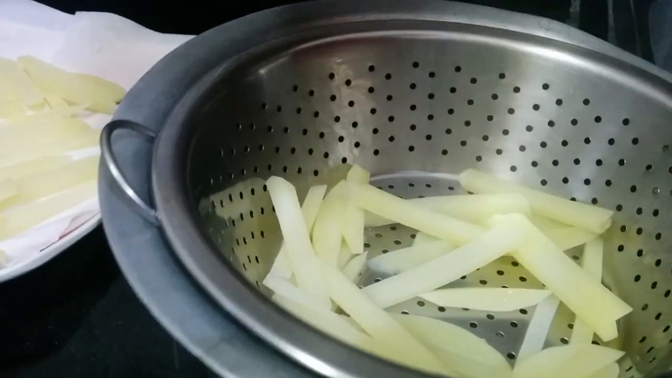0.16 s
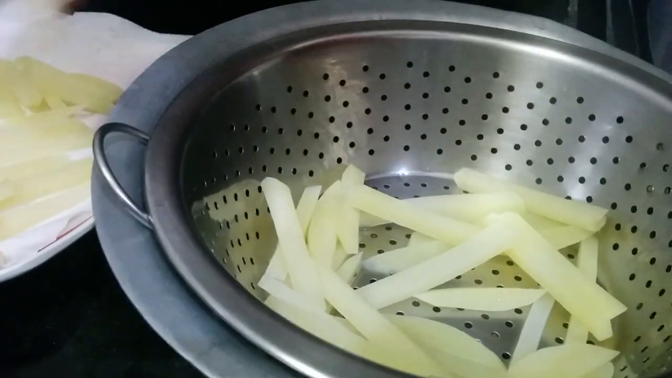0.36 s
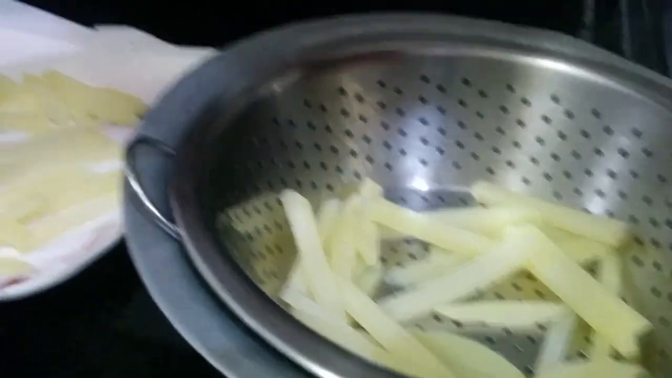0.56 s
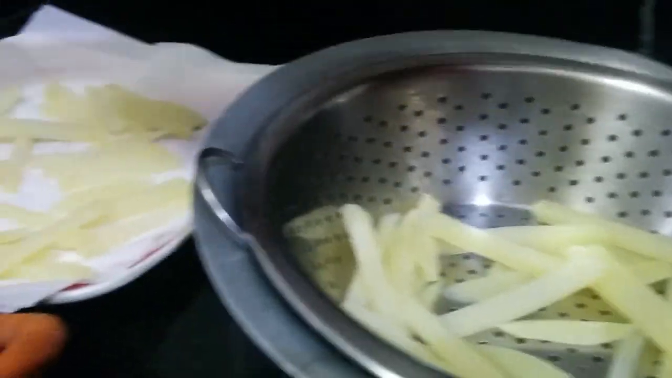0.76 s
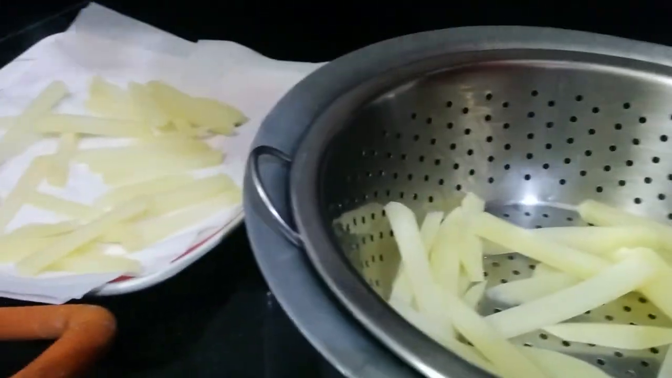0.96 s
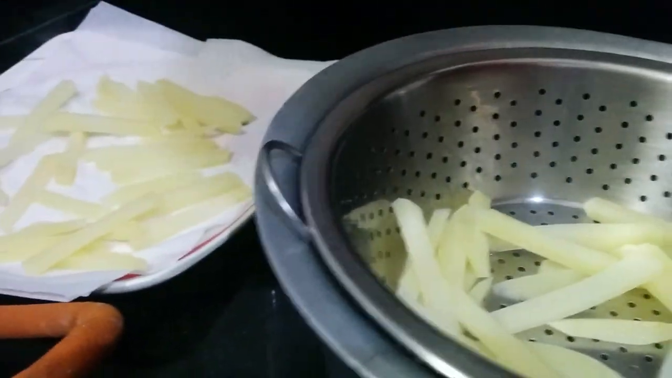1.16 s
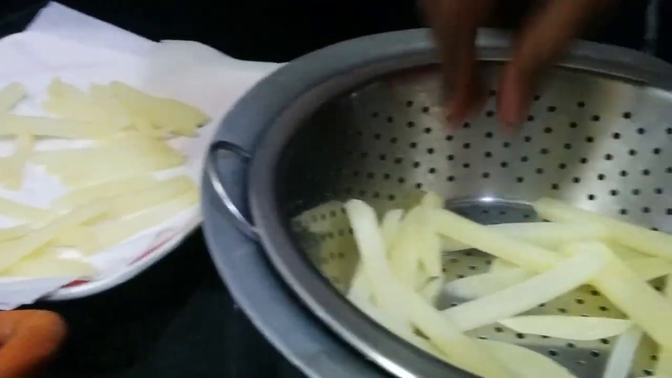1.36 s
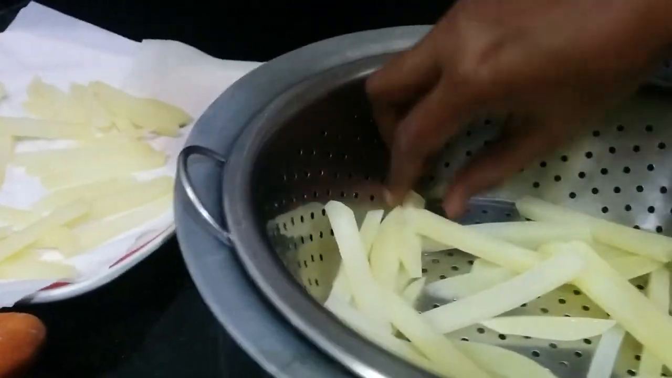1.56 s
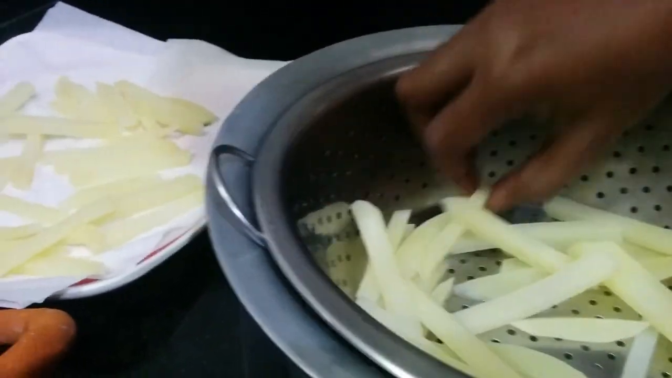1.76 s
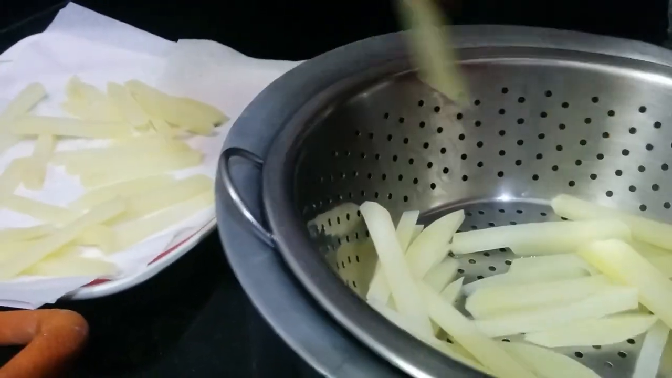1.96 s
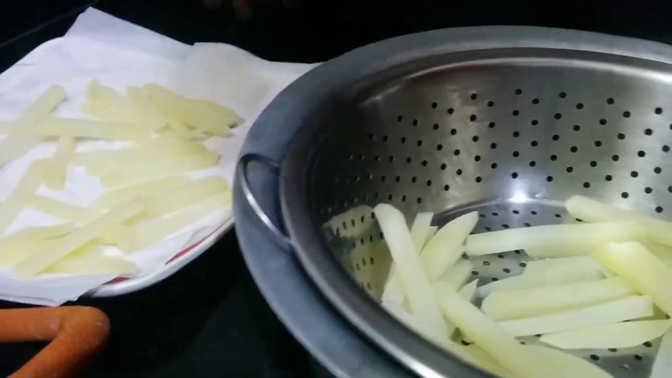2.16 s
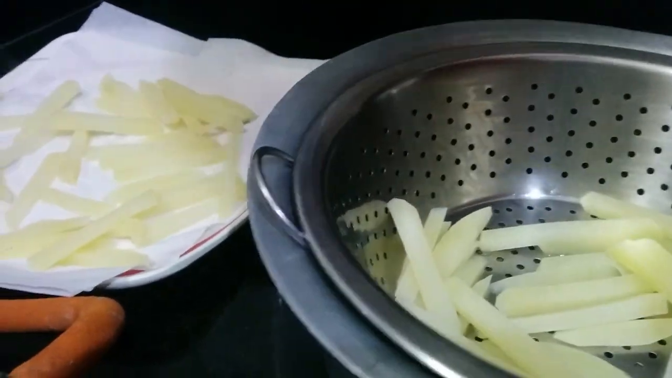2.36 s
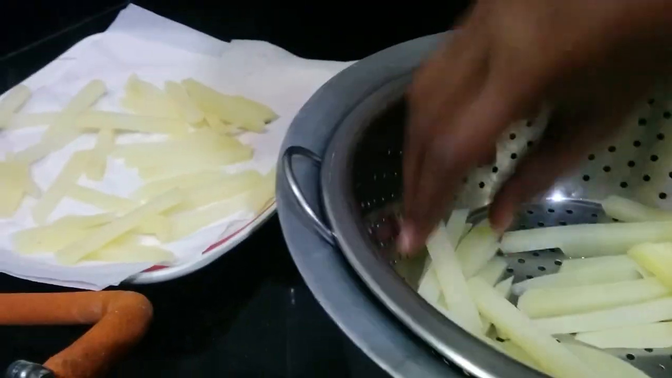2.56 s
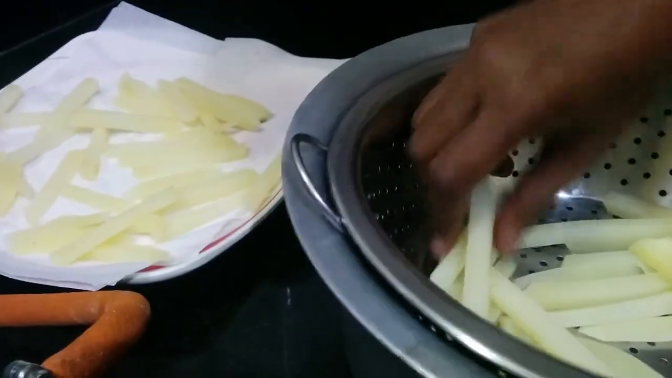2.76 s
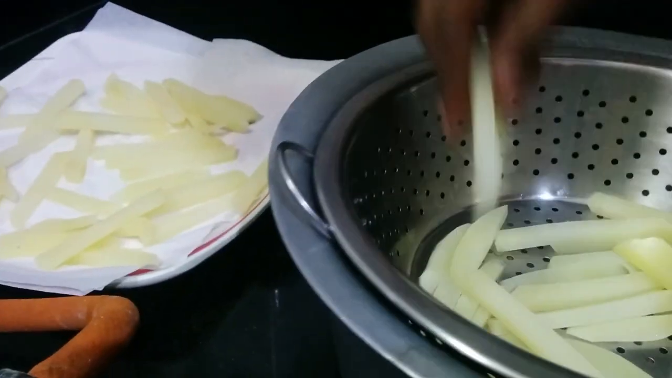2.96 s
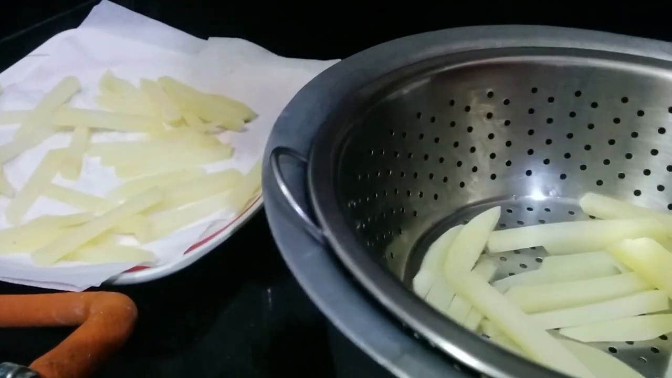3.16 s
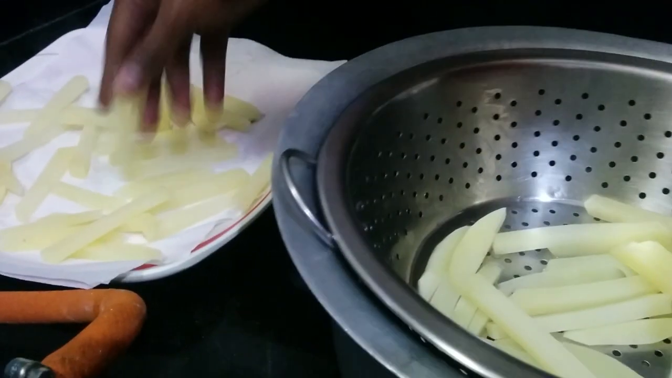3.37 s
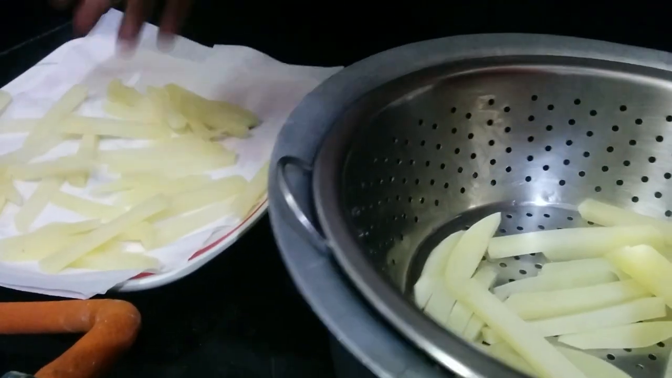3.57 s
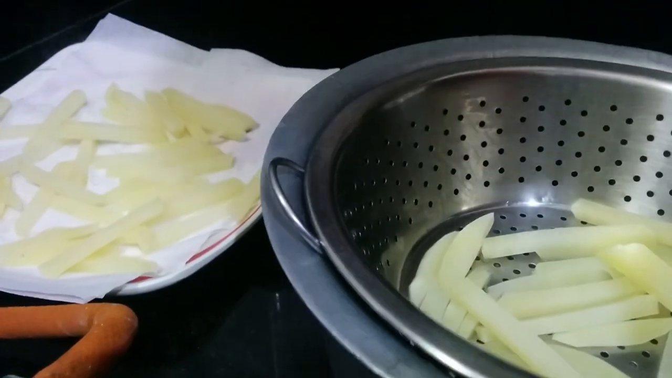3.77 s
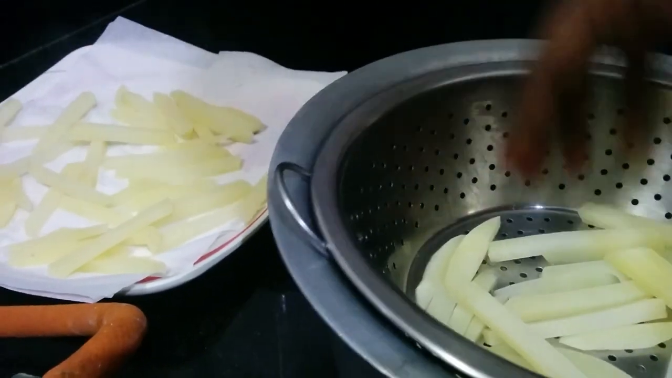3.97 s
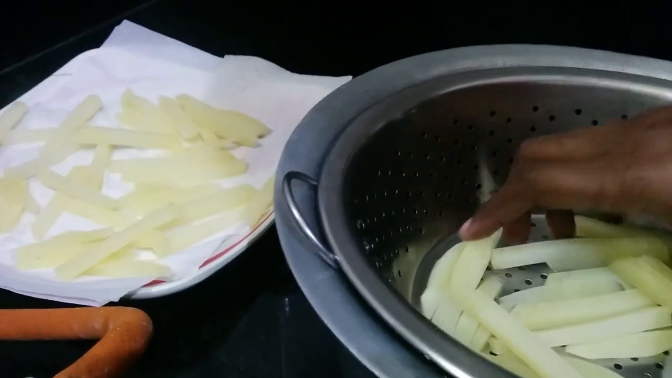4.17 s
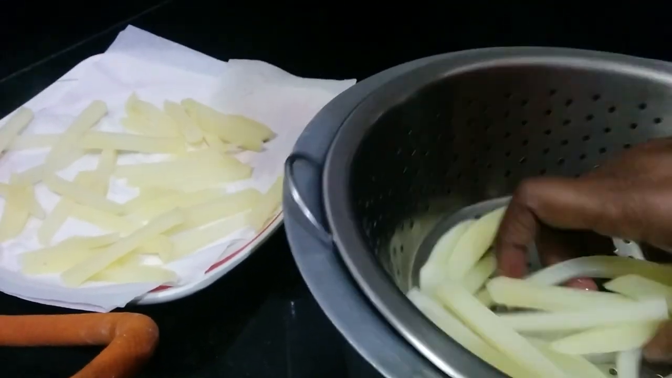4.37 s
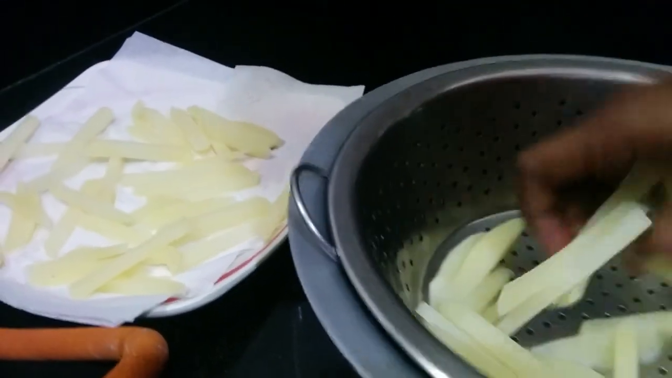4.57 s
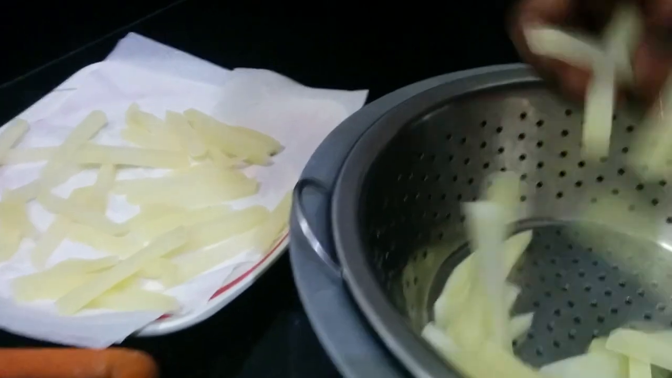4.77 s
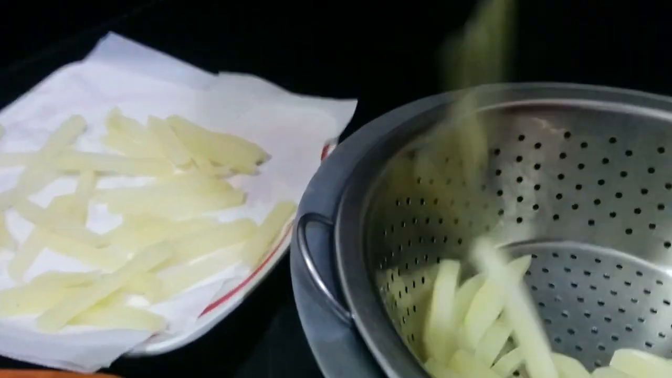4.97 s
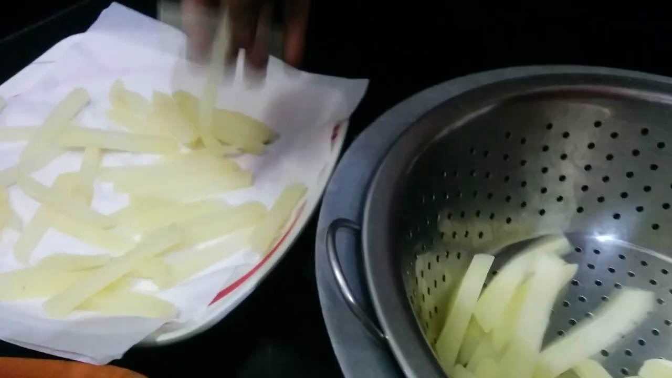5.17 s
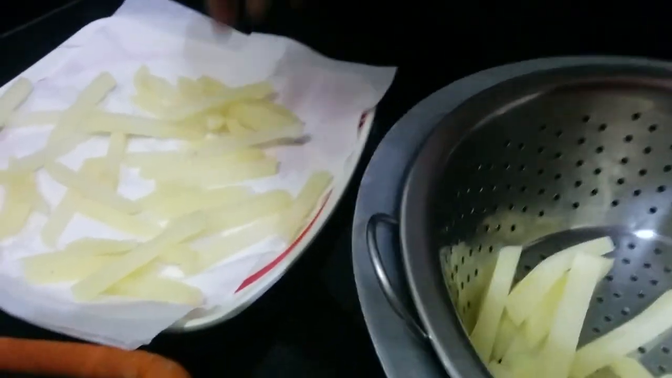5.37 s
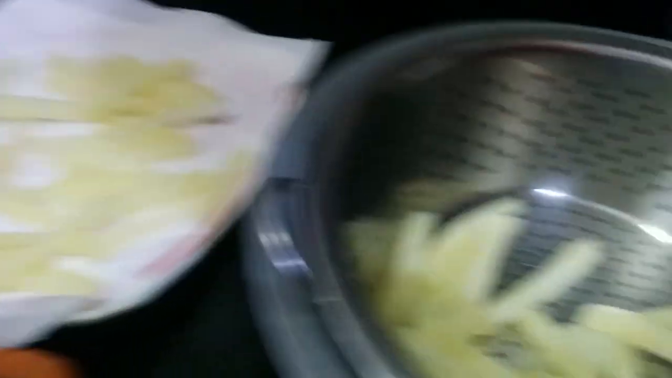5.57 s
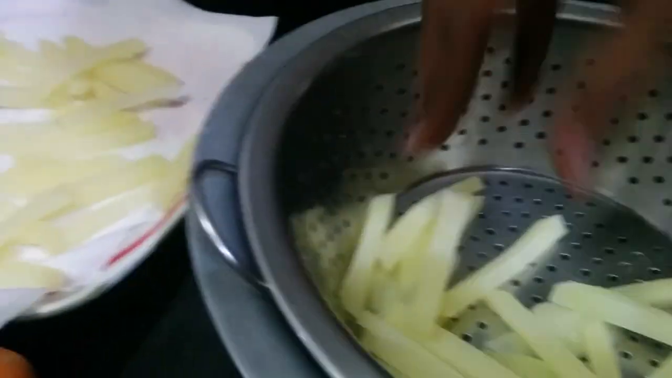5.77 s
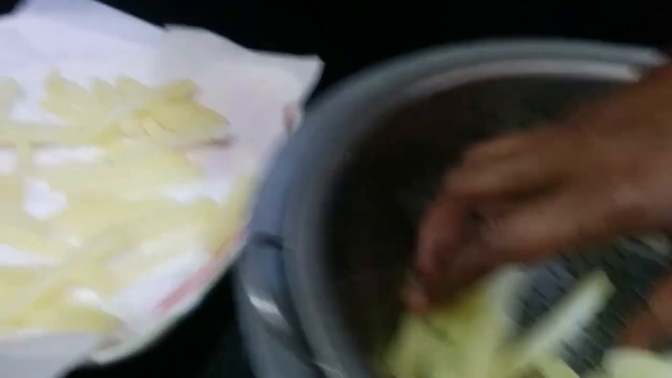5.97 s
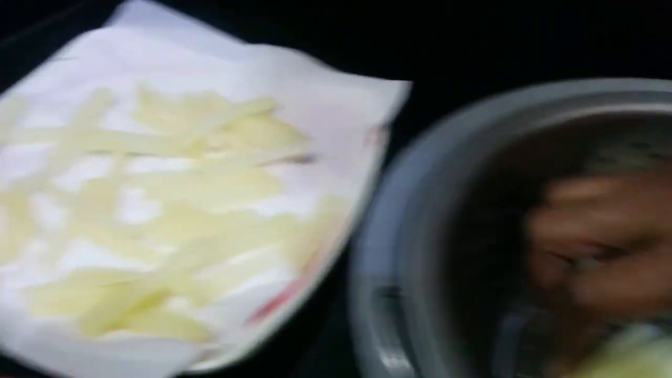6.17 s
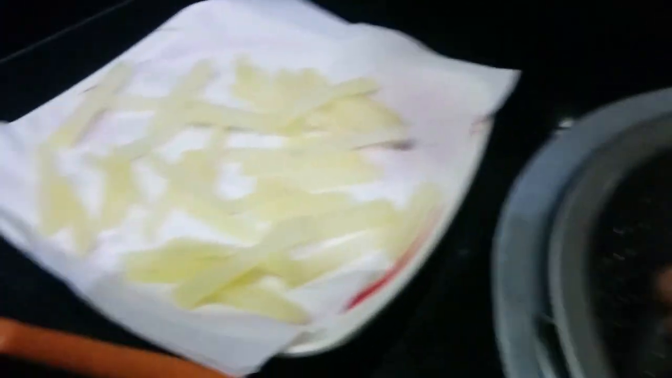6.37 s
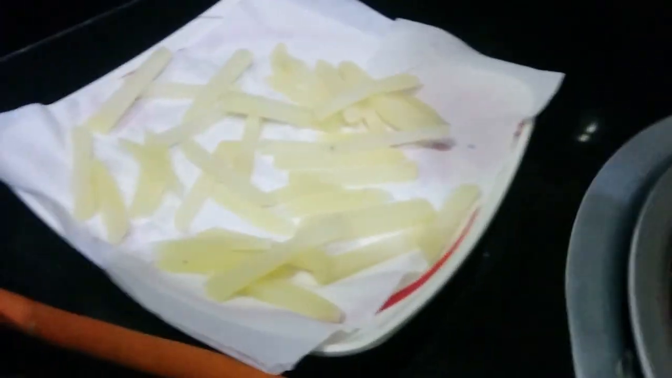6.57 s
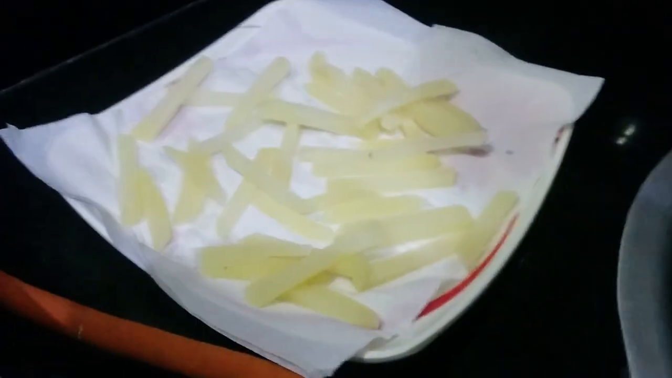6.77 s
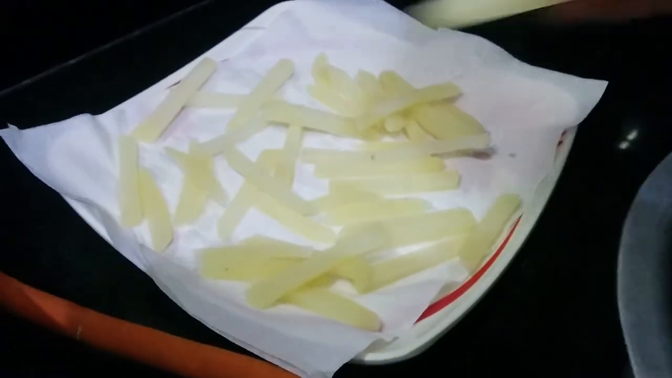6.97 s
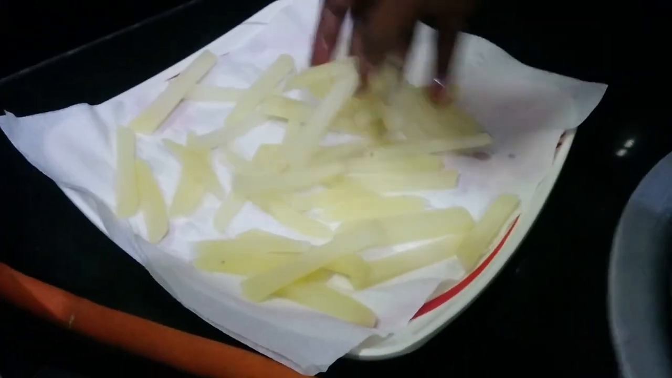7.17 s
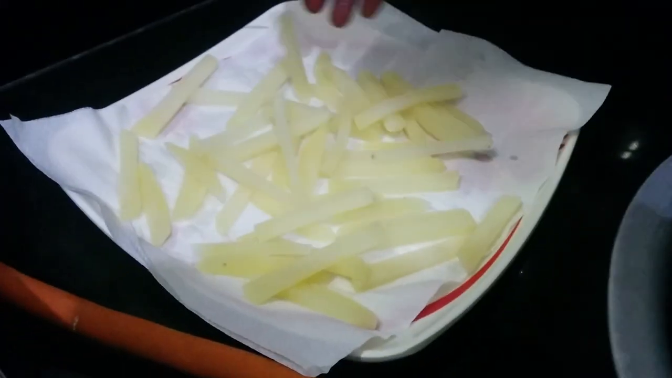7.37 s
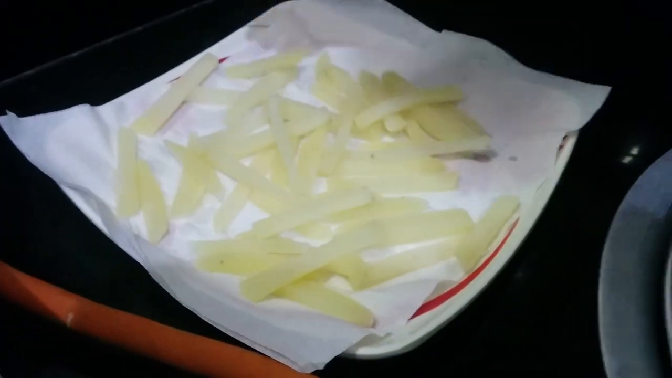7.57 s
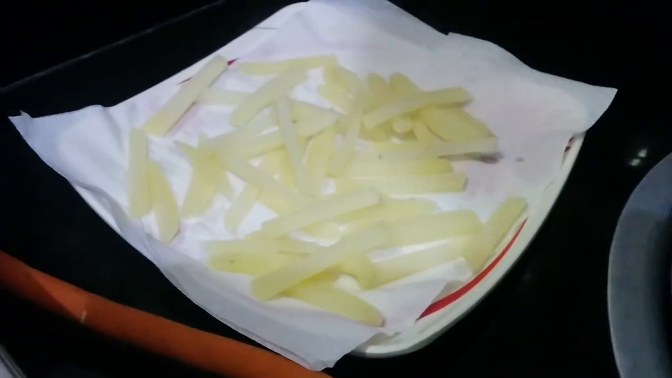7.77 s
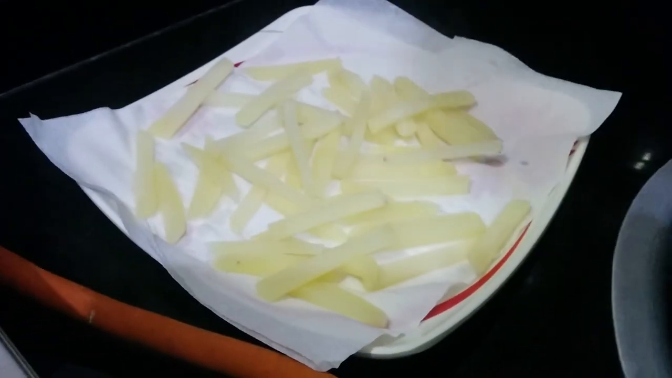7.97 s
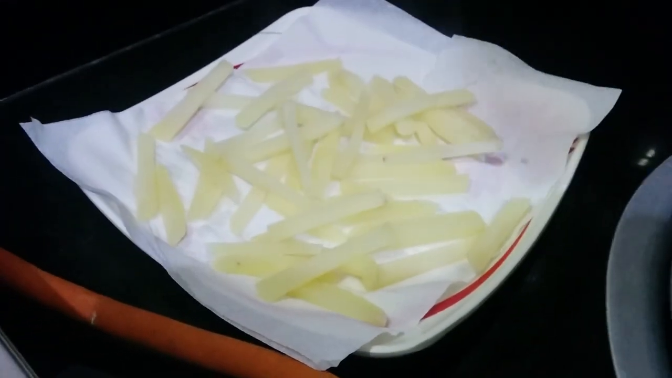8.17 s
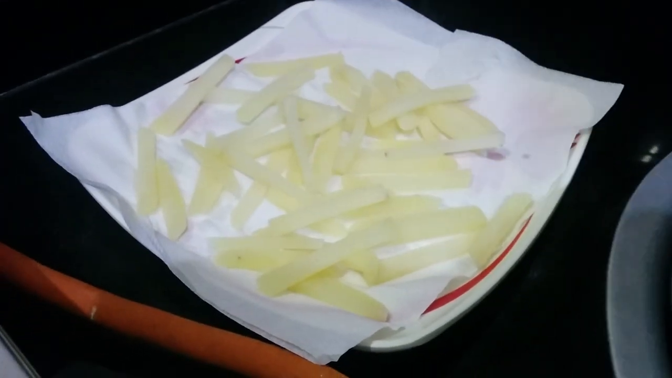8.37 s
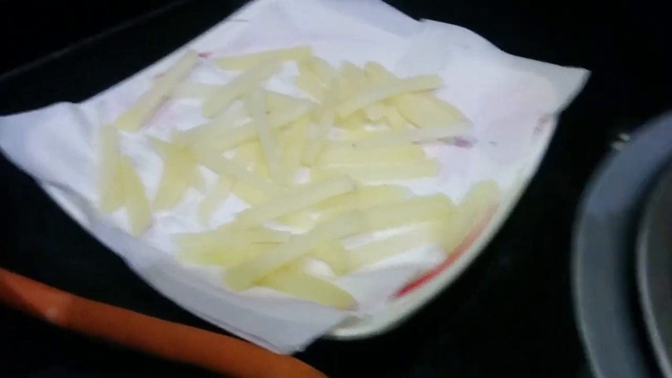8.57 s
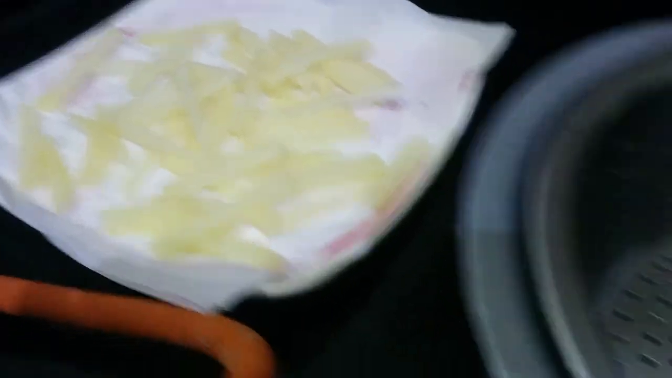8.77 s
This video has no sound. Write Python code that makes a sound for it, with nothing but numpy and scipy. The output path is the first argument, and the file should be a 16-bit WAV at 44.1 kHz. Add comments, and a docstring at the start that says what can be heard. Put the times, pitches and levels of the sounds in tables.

```python
"""A steel colander clanks and scrapes in a steel bowl as parboiled potato sticks are picked from it by hand.
Blows are noise bursts split into thump, middle and crack, plus decaying sines; scrapes are wobbling sines and grit.
Fingers and wet sticks tap the wall, light hollow touches and pips sound between, some sticks fall back,
and handfuls land softly on a tissue-lined plate. The quiet kitchen is coloured noise, a beating hum and
murmuring bowls; a noise suppressor cuts the tails short."""
import sys
import numpy as np
from scipy import signal
from scipy.fft import rfft, irfft, next_fast_len
from scipy.io import wavfile
from scipy.ndimage import uniform_filter1d

SR = 44100
rng = np.random.default_rng(int(sys.argv[2]) if len(sys.argv) > 2 else 0)


def to_wav(s):
    """Save 16-bit WAV."""
    ch = np.atleast_2d(s).T  # columns
    pcm = np.round(np.clip(ch, -1, 1) * 32767)  # PCM
    wavfile.write(sys.argv[1], SR, pcm.astype(np.int16))


N = 389403

TIME_S = np.arange(N) / SR
AGE_S = np.arange(SR // 2) / SR  # time since a contact
KITCHEN_T60_S = 0.36
FIRM_DB = -30  # strength of an ordinary contact
CRACK_TOP_HZ, CRACK_TOP_DB_PER_OCTAVE = 12300, 39.5  # harder blows crack higher up


def from_db(db):
    """Decibels to gain."""
    return 10 ** (np.asarray(db) / 20)


def in_time(rows):
    """A level curve (s, dB) as a gain per sample."""
    return from_db(np.interp(TIME_S, *np.transpose(rows)))


def fading(t60_s):
    """Free exponential decay after a contact, with a t60 of at least 5 ms."""
    return 1000 ** (-AGE_S / max(t60_s, .005))


def swelling(rise_s):
    """Build-up of the contact force, with a time constant of at least 0.2 ms."""
    return 1 - np.exp(-AGE_S / max(rise_s, .0002))


def sine(hz):
    """A steady tone as long as a contact."""
    return np.sin(2 * np.pi * hz * AGE_S)


def early_one(x):
    """Scale to rms 1 over the first 15 ms."""
    return x / np.sqrt(np.mean(x[:int(.015 * SR)] ** 2) + 1e-20)


def add(track, start_s, sound):
    """Mix a sound in at its time."""
    start = int(start_s * SR)
    track[start:start + len(sound)] += sound[:N - start]


def filtered(x, hz, kind):
    """Causal fourth-order Butterworth filter."""
    return signal.sosfilt(signal.butter(4, hz, kind, fs=SR, output="sos"), x)


def noise(spectrum, size):
    """Steady noise of a given colour (Hz, dB per Hz), rms 1."""
    padded = next_fast_len(size)
    hz, db = np.transpose(spectrum)
    bins_hz = np.maximum(np.fft.rfftfreq(padded, 1 / SR), 1)
    gain = from_db(np.interp(np.log(bins_hz), np.log(hz), db))
    x = irfft(rfft(rng.standard_normal(padded)) * gain, padded)[:size]
    return x / x.std()


def wander(per_s, size):
    """Straight lines between random values drawn per_s times a second."""
    knots = rng.standard_normal(size // 40 + 2)
    return np.interp(np.arange(size) / SR * per_s, np.arange(len(knots)), knots)


def flutter(depth_db, per_s, size):
    """A gain that wanders at random."""
    return from_db(depth_db * wander(per_s, size))


def ringing(modes, strengths):
    """Sum of damped modes (Hz, dB, t60 s), each scaled by its own strength."""
    return sum(g * from_db(db) * fading(t60_s) * sine(hz) for g, (hz, db, t60_s) in zip(strengths, modes))


def notes(rows, t60_s, rise_s):
    """One damped resonance per row (s, dB, Hz): a hollow pop or a thud."""
    out = np.zeros(N)
    for start_s, db, hz in rows:
        note = sine(hz) * fading(t60_s) * swelling(rise_s)
        add(out, start_s, from_db(db) * early_one(note))
    return out


def soft_thump(db, dullness):
    """A lighter touch of something soft lasts longer, so more of it is thump: dB against a firm one."""
    return dullness * (FIRM_DB - db)


def blows(rows, colour, rings, room_db, chatter_db, crack_hz, thump_db, middle_db, crack_db,
          strike_db, strike_t60_s=0.031, lowest_hz=60, thump_hz=750, crack_t60_s=1.0):
    """A sharp strike and a chattering burst of crowded modes with a room tail, plus clear rings."""
    out = np.zeros(N)
    size = len(AGE_S)
    for start_s, db, row_thump_db, row_crack_db, t60_s, ring_db, rise_s in rows:
        chatter = fading(t60_s) * flutter(chatter_db, per_s=490, size=size)
        strike = from_db(strike_db) * fading(strike_t60_s)
        room = from_db(room_db) * fading(KITCHEN_T60_S)
        burst = early_one(noise(colour, size) * (chatter + strike + room))
        sound = (burst + from_db(ring_db) * rings()) * swelling(rise_s)

        top_hz = CRACK_TOP_HZ * 2 ** ((db - FIRM_DB) / CRACK_TOP_DB_PER_OCTAVE)
        top_hz = np.clip(top_hz, 1.2 * crack_hz, .45 * SR)
        # weight sets the thump, hardness the crack, which dies first
        thump = early_one(filtered(sound, [lowest_hz, thump_hz], "band"))
        middle = early_one(filtered(sound, [thump_hz, crack_hz], "band"))
        crack = early_one(filtered(sound * fading(crack_t60_s), [crack_hz, top_hz], "band"))
        mix = (from_db(row_thump_db + thump_db) * thump + from_db(middle_db) * middle
               + from_db(row_crack_db + crack_db) * crack)
        add(out, start_s - rise_s / 2, from_db(db) * mix)
    return out


def hum(mains_hz=100, mains_db=-69.5, motor_db=-65.5, beat_s=.885, first_lull_s=.8, waver_db=3.0):
    """A motor hums just below the mains hum; the two beat and waver a little."""
    turns = 2 * np.pi * (TIME_S - first_lull_s)
    mains = from_db(mains_db) * np.sin(mains_hz * turns)
    motor = from_db(motor_db) * np.sin((mains_hz - 1 / beat_s) * turns)
    return (mains - motor) * flutter(waver_db, per_s=17.0, size=N)


# Low resonances of the steel bowls. Each row: frequency in Hz, level in dB before swelling.
MURMUR_MODES = [(300, -65.5), (382, -69), (520, -71)]
# Their common level curve. Each row: time in seconds, gain in dB.
MURMUR_GAIN = [(0, -8), (.7, 2), (1.2, 3.5), (1.9, -5), (3, -4.5), (4, 0.5), (5.5, -4.5), (8.83, -1.5)]


def murmur(knots_per_s=22, swell_db=4.5, swells_per_s=6):
    """Each low resonance is a narrow band of noise that slowly swells and fades."""
    out = np.zeros(N)
    for hz, db in MURMUR_MODES:
        phase = 2 * np.pi * hz * TIME_S
        narrow = wander(knots_per_s, N) * np.sin(phase) + wander(knots_per_s, N) * np.cos(phase)
        out += from_db(db) * flutter(swell_db, swells_per_s, N) * narrow
    return in_time(MURMUR_GAIN) * out


# Colour of the room noise. Each row: frequency in Hz, relative density in dB per Hz.
AIR_COLOUR = [(25, -25), (60, -14.5), (110, -12), (180, -9.5), (300, -4.5), (480, -9), (700, -10.5),
              (1100, -12), (1700, -18.5), (2600, -16.5), (4200, -29.5), (15000, -51.5)]
# Its level curve. Each row: time in seconds, level in dB.
AIR_GAIN = [(0, -59.5), (1.2, -59), (4.2, -59), (8.83, -62)]


def kitchen(drift_db=3, drifting_db=-6):
    """Room noise whose middle range drifts slowly, a beating hum and the low murmur of the bowls."""
    middle = filtered(noise(AIR_COLOUR, N), [450, 3200], "band")
    drifting = from_db(drifting_db) * flutter(drift_db, per_s=4.0, size=N) * middle
    return in_time(AIR_GAIN) * (noise(AIR_COLOUR, N) + drifting) + hum() + murmur()


def settling(count=190, level_db=-54, spread_db=1.5, tilt_db_per_octave=-3.5, t60_s=0.018, lowest_hz=280):
    """Faint soft ticks at random times, over a decade of pitch; the higher ones are weaker."""
    out = np.zeros(N)
    short = SR // 10
    envelope = swelling(0.001) * fading(t60_s)
    for when, pitch, strength in rng.random((count, 3)):
        hz = lowest_hz * 10 ** pitch
        db = level_db + spread_db * (2 * strength - 1) + tilt_db_per_octave * np.log2(hz / lowest_hz)
        add(out, when * N / SR, (from_db(db) * envelope * sine(hz))[:short])
    return out


# Colour of the moving hand. Each row: frequency in Hz, relative density in dB per Hz.
RUSTLE_COLOUR = [(500, -24), (2200, -9.5), (2750, 2), (3200, -7.5), (4200, -9.5), (5000, -9), (6000, -14.5),
                 (8500, -8), (14000, -22)]
# Its level curve. Each row: time in seconds, level in dB before flutter.
RUSTLE_GAIN = [(0.78, -100), (0.92, -70.5), (1.1, -79.5), (1.35, -71), (1.55, -89.5), (2.05, -90),
               (2.2, -70.5), (2.55, -69), (2.61, -59.5), (2.76, -67), (2.86, -115), (5.4, -115),
               (5.68, -69), (5.82, -71.5), (5.9, -115)]


def rustle(grain_db=2.0):
    """Fluttering noise as the hand moves about and reaches back into the colander."""
    return in_time(RUSTLE_GAIN) * flutter(grain_db, per_s=76, size=N) * noise(RUSTLE_COLOUR, N)


# Sticks landing on tissue. Each row: start in seconds, strength in dB, rise in seconds.
TISSUE_LANDINGS = [(2.073, -58, 0.00525), (2.32, -64, 0.0057), (3.394, -63, 0.0065), (5.229, -45, 0.004),
                   (7.174, -21.5, .0013), (7.197, -28, .002), (7.215, -37.5, .002), (7.261, -51, 0.0038),
                   (7.276, -51, 0.0048)]
# Colour of the landing. Each row: frequency in Hz, relative density in dB per Hz.
TISSUE_COLOUR = [(40, -59), (160, -12), (290, 8), (510, 7.5), (700, -2), (1350, -7), (2400, -14.5),
                 (3500, -27), (6000, -42), (15000, -69)]


def drops(t60_s=0.07, plate_db=-2, plate_hz=510, plate_t60_s=0.071):
    """Tissue and heaped sticks leave the plate one short, low note, clearest under a light landing."""
    def plate():
        return early_one(sine(plate_hz) * fading(plate_t60_s))

    landings = []
    for start_s, db, rise_s in TISSUE_LANDINGS:
        ring_db = plate_db + soft_thump(db, dullness=0.48)
        landings.append((start_s, db, soft_thump(db, dullness=0.44), 0, t60_s, ring_db, rise_s))
    return blows(landings, TISSUE_COLOUR, plate, room_db=-10.5, chatter_db=4.5, crack_hz=3292,
                 thump_db=-10.5, middle_db=-10.5, crack_db=-36.0, strike_db=2.5)


# Modes of the colander in its bowl. Each row: frequency in Hz, relative level in dB, t60 in seconds.
COLANDER_MODES = [(127, -11.5, .3), (180, -14, .25), (282, -6, .33), (357, -4, .2), (387, .5, .24),
                  (472, -4, .24), (524, -11, .2), (745, -16, .25), (1085, -14, .22), (2153, -14, .25),
                  (2274, -8.5, .24), (2417, -15, .2), (2642, -9, .2), (2675, -5.5, .22), (2735, -8, .2),
                  (3904, -7, .22), (4003, -11, .18), (4107, 1.5, .2), (4134, -8, .2), (4402, -8, .2),
                  (4514, -10, .22), (4574, -9, .22), (4824, -11, .22), (4872, -11, .22), (5134, -10, .22)]


def colander_ring(scatter_db=2.0, rattle_db=3):
    """Every touch gives each mode its own strength, and the rim rattles on the bowl as it rings."""
    count = len(COLANDER_MODES)
    strengths = from_db(rng.normal(0, scatter_db, count)) * rng.choice([-1, 1], count)
    rattle = flutter(rattle_db, per_s=140, size=len(AGE_S))
    return early_one(ringing(COLANDER_MODES, strengths) * rattle)


# Sticks falling back. Each row: start in seconds, strength in dB, first decay t60 in seconds,
# thud in dB re strength, thud frequency in Hz.
STICK_FALLS = [(1.598, -52, 0.1, 0, 269), (1.619, -58.5, 0.045, 4, 269), (4.843, -38.5, 0.37, -7, 279),
               (4.953, -36.5, 0.06, -6.5, 327), (4.991, -28, 0.05, -23, 294),
               (5.001, -26.5, 0.061, -14.5, 432), (5.007, -25.5, 0.05, -6, 278.6),
               (5.039, -41, 0.05, -8, 303), (5.068, -42, .04, -16, 500), (5.098, -47, 0.049, 3, 292),
               (5.143, -49.5, 0.04, 3, 496), (8.549, -42.5, 0.03, 1, 330)]
# Colour of a stick on steel. Each row: frequency in Hz, relative density in dB per Hz.
STICK_COLOUR = [(40, -53), (130, -21), (200, 1.5), (285, 14), (500, 0.5), (1150, -7), (1600, -19.5),
                (2400, -19.5), (3500, -29), (4800, -27), (6000, -41.5), (15000, -55.5)]


def falls(ring_db=-7, rise_s=0.0037):
    """Soft, heavy sticks tumble down the wall, mostly shake the low modes and add round thuds."""
    def low_ring():
        return early_one(filtered(colander_ring(), 1530, "low"))

    landings = [(start_s, db, soft_thump(db, dullness=0.56), 0, t60_s, ring_db, rise_s)
                for start_s, db, t60_s, *_ in STICK_FALLS]
    thuds = [(start_s, db + thud_db, hz) for start_s, db, _, thud_db, hz in STICK_FALLS]
    tumble = blows(landings, STICK_COLOUR, low_ring, room_db=-8, chatter_db=4.5, crack_hz=3130,
                   thump_db=-14, middle_db=-13.0, crack_db=-26.5, strike_db=-35)
    return tumble + notes(thuds, t60_s=0.098, rise_s=0.002)


# Modes of the wall under a hand. Each row: frequency in Hz, relative level in dB, t60 in seconds.
HELD_WALL_MODES = [(508, -3.5, 0.11), (770, -4.5, 0.12), (1166, 0, 0.16), (1358, 6, 0.11),
                   (1602, 6.5, 0.12), (1780, 8, .08), (2096, 9.5, 0.067), (2300, 5, 0.063),
                   (2634, 5.5, 0.08), (3480, 1, 0.07)]


def held_wall_ring(scatter_db=3):
    """Each touch finds the modes of the held wall with strengths of its own."""
    strengths = from_db(rng.normal(0, scatter_db, len(HELD_WALL_MODES)))
    return early_one(ringing(HELD_WALL_MODES, strengths))


# Fingers and sticks on the wall, and two light hollow touches at the plate (2.248 s and 5.24 s).
# Each row: start in seconds, strength in dB, relative crack in dB, first decay t60 in seconds,
# hollow pop in dB re strength, pop frequency in Hz.
LIGHT_TAPS = [(0.634, -36.5, -57, .025, -17, 1018), (2.248, -42.5, -25.5, 0.035, -19.5, 1100),
              (4.61, -37, -12.5, 0.049, -14.5, 1163), (4.842, -32.5, -43, 0.011, -14, 1150),
              (5.24, -52, -48, 0.06, -6, 1135), (5.906, -30, -18, 0.11, -10, 1154),
              (6.022, -29.5, -16, 0.022, -21, 1296), (6.047, -39, -44, 0.086, -15, 1272),
              (6.126, -36, -13, 0.025, -22, 1160), (6.144, -26, -39, 0.035, -18.5, 1123),
              (6.252, -32.5, -22.5, 0.0087, -9, 1184), (6.38, -39, -36, 0.024, -12.5, 1070),
              (6.454, -39, -25, 0.034, -10, 1036), (6.619, -34.5, -57, .04, -17, 1033),
              (6.834, -37.5, -46, 0.027, -11.5, 1143), (6.923, -40, -52, 0.088, -8, 1215),
              (7.308, -46.5, -46.5, 0.026, -1.5, 1194), (8.522, -29.5, -30, 0.016, -32, 1120),
              (8.551, -22.5, -29, 0.014, -13.5, 1028), (8.695, -31, -48, 0.015, -16, 1116)]
# Faint hollow pips. Each row: start in seconds, level in dB, frequency in Hz.
HOLLOW_PIPS = [(7.436, -64, 1200), (7.558, -60.5, 1186), (7.572, -67.5, 1120), (7.809, -63.5, 1230),
               (8.059, -64.5, 977), (8.413, -54.5, 1100)]
# Colour of a light tap. Each row: frequency in Hz, relative density in dB per Hz.
TAP_COLOUR = [(40, -5), (130, -2.5), (350, -13), (490, 1), (630, -9), (760, -19), (880, -15), (1020, 4.5),
              (1280, 5.5), (1470, -5), (1700, 4.5), (2250, -4.5), (2700, 1.5), (3200, -11), (3480, -9),
              (3800, -22), (4500, -31), (6000, -25.5), (15000, -29)]


def taps(ring_db=-20, wall_db=0, rise_s=.003):
    """Damped bursts led by a hollow pop; on the wall, the hand damps the steel and sets the pop's pitch."""
    def damped_ring():
        return from_db(ring_db) * colander_ring() + held_wall_ring()

    touches = [(start_s, db, soft_thump(db, dullness=0.091), crack_db, t60_s, wall_db, rise_s)
               for start_s, db, crack_db, t60_s, *_ in LIGHT_TAPS]
    pops = [(start_s, db + hollow_db, hz) for start_s, db, _, _, hollow_db, hz in LIGHT_TAPS]
    bursts = blows(touches, TAP_COLOUR, damped_ring, room_db=-6.5, chatter_db=3.0, crack_hz=3400,
                   thump_db=-21.0, middle_db=-16.0, crack_db=-9.5, strike_db=-7.0)
    return bursts + notes(pops + HOLLOW_PIPS, t60_s=0.06, rise_s=0.0015)


# Steel slipping on steel, and one long hollow ring near 1 kHz. Each row: start in seconds,
# rms over the first 15 ms in dB, tone in Hz, t60 in seconds, roughness from 0 to 1.
SQUEAKS_AND_RING = [(3.887, -62, 3060, 0.11, 1), (4.242, -51, 3040, 0.035, .9),
                    (4.887, -41.5, 4650, 0.21, 0.63), (4.895, -39, 2500, 0.14, 0.7),
                    (4.897, -39, 2290, 0.21, 0.08), (4.994, -50.5, 4450, 0.17, 0.5),
                    (5.068, -52.5, 4450, 0.019, 0.46), (5.101, -50.5, 4700, 0.094, 0.34),
                    (5.888, -42, 4800, 0.1, 0.61), (6.109, -49, 4400, 0.075, 0.53),
                    (6.246, -49.5, 4270, 0.039, 0.48), (8.439, -29.5, 2950, 0.086, 0.6),
                    (8.483, -34.5, 3995, 0.078, 0.27), (8.559, -44, 1040, 0.27, 0.2),
                    (8.78, -43.5, 2993, 0.11, 0.7)]


def scrapes(wobble=0.09, wobbles_per_s=900, grit_db=0, ring_db=-16, room_db=-22, rise_s=0.003,
            grit_from=0.44, grit_to=1.266):
    """Slips, and one hollow ring, are tones over the colander's ring; roughness adds wobble and grit."""
    out = np.zeros(N)
    size = len(AGE_S)
    for start_s, db, hz, t60_s, rough in SQUEAKS_AND_RING:
        # pitch changes too fast to be heard as a glide
        pitch_hz = hz * (1 + wobble * rough * wander(wobbles_per_s, size))
        tone = early_one(np.sin(2 * np.pi * np.cumsum(pitch_hz) / SR))
        grit = early_one(filtered(rng.standard_normal(size), [hz * grit_from, hz * grit_to], "band"))
        source = np.sqrt(1 - np.clip(rough, 0, 1)) * tone + rough * from_db(grit_db) * grit
        direct = fading(t60_s) * flutter(depth_db=0.5, per_s=399, size=size)
        room = from_db(room_db) * fading(KITCHEN_T60_S)
        sound = source * (direct + room) + from_db(ring_db) * colander_ring()
        add(out, start_s, from_db(db) * early_one(sound * swelling(rise_s)))
    return out


# Colander knocks on the bowl. Each row: start in seconds, strength in dB, relative thump in dB,
# relative crack in dB, first decay t60 in seconds, ring in dB re the burst.
COLANDER_KNOCKS = [(1.627, -32.5, -27, -28, 0.15, -26), (1.803, -31, -48, -26.5, 0.17, -19),
                   (2.803, -33, -24, -28.5, 0.24, -20), (4.192, -26.5, -18, -17.5, 0.12, -15),
                   (4.217, -28.5, -25, -23, 0.081, -14), (4.24, -32.5, -37, -18, 0.018, -19),
                   (4.369, -7, -12.5, -18.5, 0.087, 5.5), (4.376, -11.5, -15.5, -28, 0.1095, -6.5),
                   (4.495, -19.5, -16, -20, 0.064, -8), (4.583, -28, -22, -29, 0.15, -7.5),
                   (5.923, -22.5, -21.5, -21.5, 0.083, -17), (5.941, -22.5, -22.5, -27.5, 0.054, -9),
                   (5.964, -27.5, -14, -29.5, 0.11, -26), (6.473, -24.5, -24.5, -22.5, 0.074, -11),
                   (6.519, -30, -15.5, -27, 0.11, -13), (8.438, -29.5, -34, -5, 0.22, -19),
                   (8.466, -12, -14, -20.5, 0.072, -10), (8.572, -12.5, -19.5, -19, 0.059, -11),
                   (8.584, -15.5, -22, -20.5, 0.073, -20), (8.6, -17.5, -20, -22, 0.066, -14),
                   (8.646, -20.5, -21, -22.5, 0.044, -9), (8.742, -40.5, -43, -18, 0.15, -18),
                   (8.78, -35, -33, -20, 0.12, -11)]
# Bowl rocking on the counter under the hardest knocks. Each row: start in seconds, level in dB, Hz.
BOWL_THUDS = [(4.367, -23, 395.8), (8.466, -22.5, 387.6)]
# Colour of steel on steel. Each row: frequency in Hz, relative density in dB per Hz.
STEEL_COLOUR = [(40, -19.5), (120, -5), (200, -5), (280, 3.5), (380, -2), (540, 1.5), (850, -7),
                (1100, -0.5), (1400, -18.5), (1750, -4.5), (1970, -15.5), (2250, -2.5), (2700, -1.5),
                (3300, -6), (3700, -9), (4050, -2.5), (4500, 2), (5500, -5), (6100, -11), (6700, -10.5),
                (7100, -11.5), (10000, -11.5), (15500, -23)]


def clanks(firm_pop_db=-50, pop_db_per_db=0.4, pop_hz=1090, rise_s=0.001):
    """Hard knocks jolt the colander free to ring; light ones stay damped and sound more hollow."""
    knocks = [(*row, rise_s) for row in COLANDER_KNOCKS]
    steel = blows(knocks, STEEL_COLOUR, colander_ring, room_db=-8.5, chatter_db=1.4, crack_hz=6250,
                  thump_db=-3.5, middle_db=-14.5, crack_db=-3.0, strike_db=-2)
    pops = [(start_s, firm_pop_db + pop_db_per_db * (db - FIRM_DB), pop_hz)
            for start_s, db, *_ in COLANDER_KNOCKS]
    thuds = filtered(notes(BOWL_THUDS, t60_s=0.0543, rise_s=0.00064), 150, "high")
    return steel + notes(pops, t60_s=0.076, rise_s=.0015) + thuds


def scene():
    """Everything on the counter, heard from close by, over the kitchen background."""
    background = kitchen() + settling() + rustle()
    light_sounds = drops() + falls() + taps()
    return (background + light_sounds + scrapes() + clanks())[None]


def gate(power, opening_db, depth_db, steepness):
    """Gain that sinks towards depth_db unless the power stands opening_db above its median."""
    excess = np.maximum(power, 0) / np.median(power, axis=-1, keepdims=True) / from_db(opening_db) ** 2
    return 1 - (1 - from_db(depth_db)) / (1 + excess ** steepness)


def lingering(power, loud_db, recover_s):
    """Near 1 while the power stands loud_db above its median, then falling to 0 over recover_s."""
    loud = gate(power, opening_db=loud_db, depth_db=-np.inf, steepness=6)
    release = np.linspace(0, N / SR, power.shape[-1]) / recover_s
    return np.maximum.accumulate(loud + release, axis=-1) - release


# Suppressor by band, stricter in the treble. Each row: frequency in Hz, opening in dB, depth in dB.
SUPPRESSOR_BANDS = [(290, 1.5, -1.5), (2720, 3.5, -9), (4360, 22, -6.5), (7000, 26.5, -5)]


def suppressor(x, duck_db=-2.5, size=512):
    """Quiet bands are turned down; all sinks near the background, most just after a loud sound."""
    hz, _, frames = signal.stft(x, SR, nperseg=size)
    gate_hz, *settings = np.transpose(SUPPRESSOR_BANDS)
    opening_db, depth_db = [np.interp(hz, gate_hz, column)[:, None] for column in settings]
    power = uniform_filter1d(abs(frames) ** 2, size=2, axis=2)
    total = power.sum(axis=1, keepdims=True)
    by_band = gate(uniform_filter1d(power, size=3, axis=1), opening_db, depth_db, steepness=9)
    ducked_db = duck_db * lingering(total, loud_db=11, recover_s=0.93)
    overall = gate(total, opening_db=7.0, depth_db=ducked_db - 10, steepness=1.9)
    return signal.istft(frames * by_band * overall, nperseg=size)[1][:, :N]


# Steady microphone hiss. Each row: frequency in Hz, relative density in dB per Hz.
HISS_COLOUR = [(1000, -2), (5000, -1.5), (9000, 0.5), (14500, -3.5), (15800, -18)]
# Hiss let through by the open suppressor. Each row: frequency in Hz, relative density in dB per Hz.
OPEN_HISS_COLOUR = [(3000, -19), (6000, -9), (7500, 2.5), (9500, -1), (13000, -6.5), (15500, -16)]


def record(dry, hiss_db=-86, open_hiss_db=-82, cutoff_hz=15900):
    """Suppress noise, add hiss that rises while a sound holds the suppressor open, cut the top."""
    opened = lingering(uniform_filter1d(dry ** 2, size=512), loud_db=10.0, recover_s=0.21)
    steady_hiss = from_db(hiss_db) * noise(HISS_COLOUR, N)
    open_hiss = from_db(open_hiss_db) * opened * noise(OPEN_HISS_COLOUR, N)
    top_cut = signal.ellip(10, .3, 80, cutoff_hz, fs=SR, output="sos")
    return signal.sosfilt(top_cut, suppressor(dry) + steady_hiss + open_hiss)


dry = scene()
out = record(dry)
to_wav(out)
```